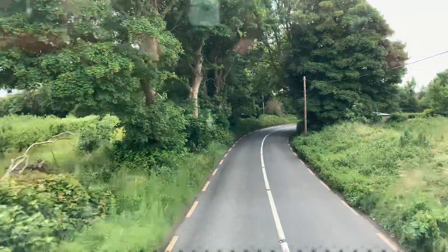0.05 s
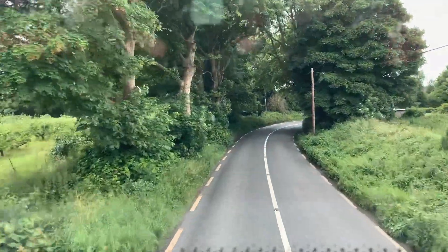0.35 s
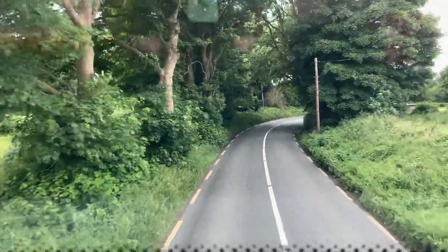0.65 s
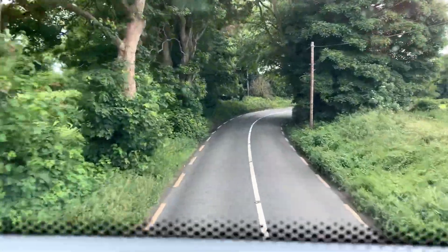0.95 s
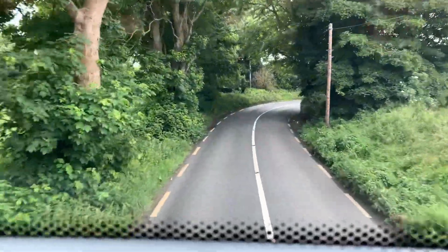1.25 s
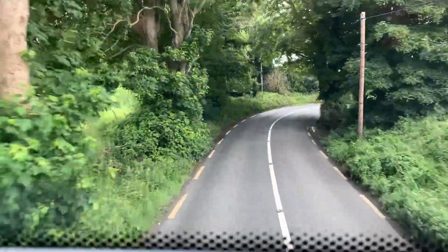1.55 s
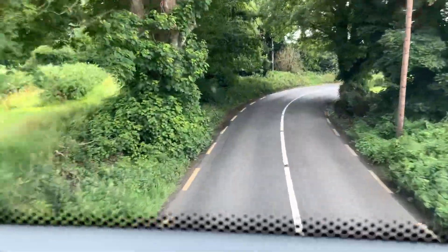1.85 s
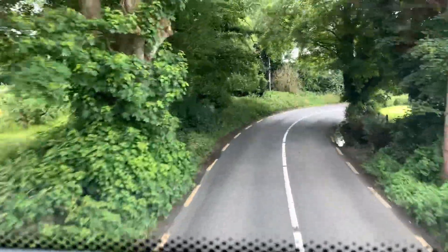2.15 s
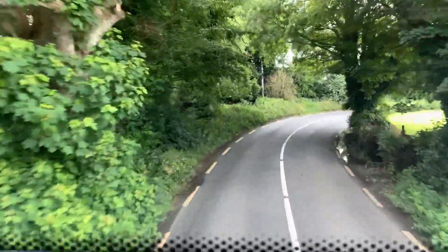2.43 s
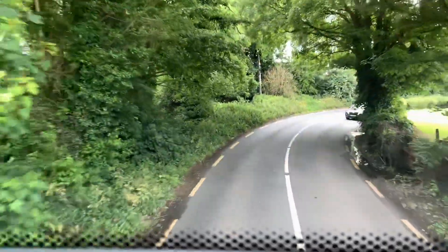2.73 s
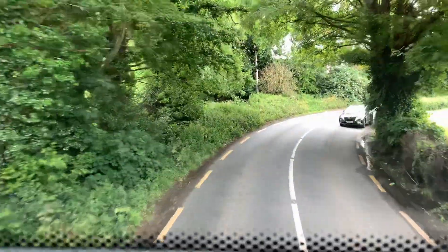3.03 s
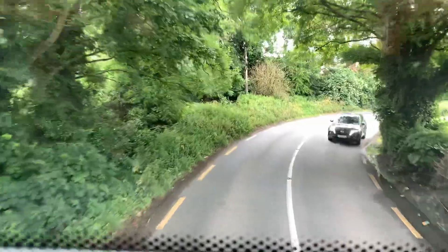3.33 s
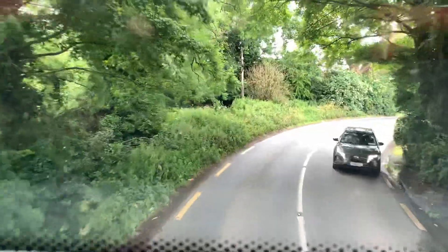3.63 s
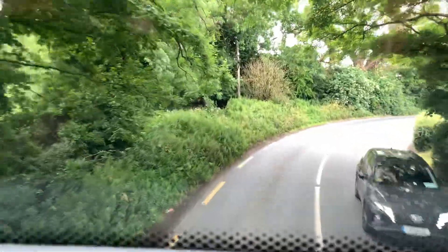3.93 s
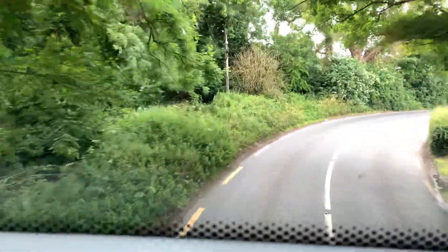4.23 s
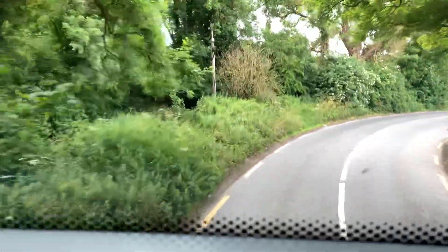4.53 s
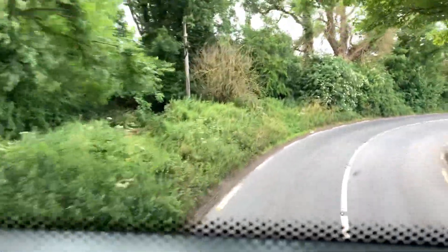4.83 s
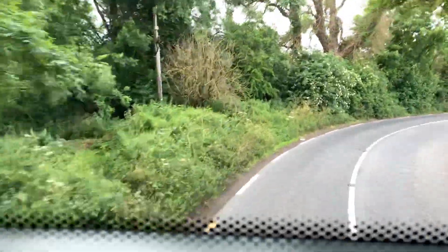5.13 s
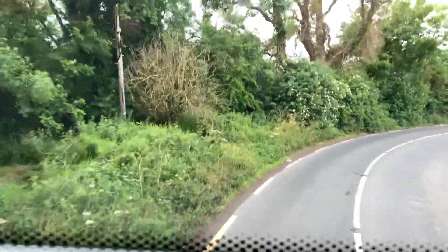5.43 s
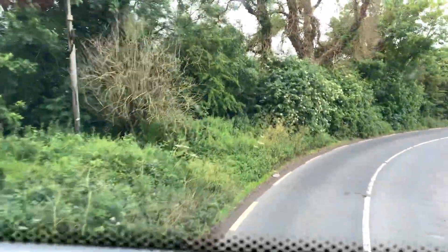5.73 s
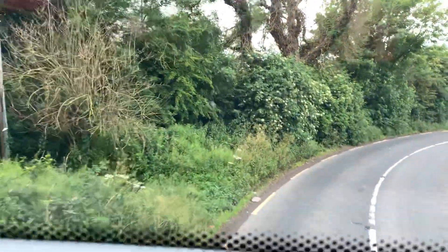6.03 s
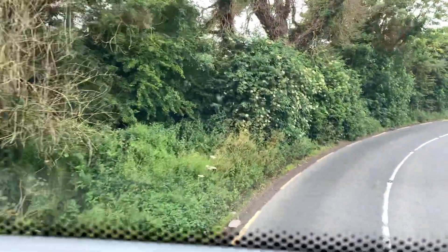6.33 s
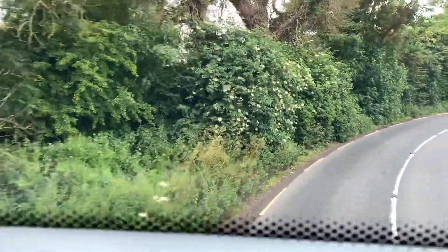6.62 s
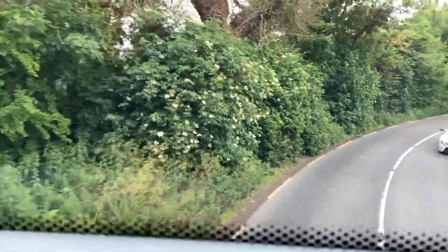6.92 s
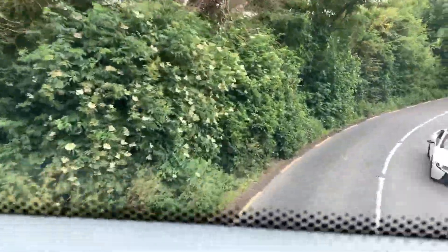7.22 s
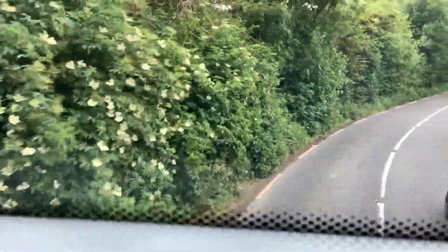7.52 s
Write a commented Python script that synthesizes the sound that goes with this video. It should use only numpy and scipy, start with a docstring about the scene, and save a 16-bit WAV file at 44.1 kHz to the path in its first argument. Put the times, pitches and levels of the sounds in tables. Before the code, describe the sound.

Heard from the front seat inside a bus on a country road, a low engine drone and hum run under a steady boom of road and tyres. Loose panels and fittings chatter, clink and knock throughout, with sharp plastic ticks and brief squeaks. The engine sinks in pitch, then picks up just past halfway as rougher tarmac brings louder thuds and rattles. Another jolt shakes the cabin near the end.

```python
"""Bus on a winding country road

Heard inside, at the front. The engine's firing harmonics drone, beat against a second hum and sink
as the bus eases into a bend. The road booms through the body and the tyres roar. Rough tarmac, dips
and bumps shake loose panels and fittings, which chatter, clink, knock, tick and squeak."""
import sys
import numpy as np
from scipy import signal
from scipy.fft import rfft, irfft, next_fast_len
from scipy.io import wavfile
from scipy.ndimage import uniform_filter1d, map_coordinates

SR = 44100
rng = np.random.default_rng(int(sys.argv[2]) if len(sys.argv) > 2 else 0)


def materialize(psi):
    """Save the field psi as 16-bit PCM at rate SR to the path in sys.argv[1].

    A 1-D psi becomes a single channel; in a 2-D psi each row is a channel.
    """
    bounded = np.clip(np.atleast_2d(psi).T, -1, 1)
    quanta = np.round(bounded * 32767).astype(np.int16)
    wavfile.write(sys.argv[1], SR, quanta)


N = 342657
TIME = np.arange(N) / SR
ATTACK_S = 0.0003
BUMP_LEAD_S = 0.025  # loose parts move before a bump's crest

# tarmac roughness: (time [s], tyre roar [dB], cabin rattle [dB])
ROUGHNESS = [(0.0, -35.5, -50), (0.13, -33, -38.5), (0.245, -31, -47), (0.29, -32, -41.5),
             (0.53, -34, -43.5), (0.7, -29.5, -42.5), (0.85, -32, -42.5), (1.05, -32.5, -38),
             (1.23, -30, -43.5), (1.28, -34, -39), (1.36, -30.5, -39.5), (1.7, -33.5, -38),
             (2.05, -34.5, -46.5), (2.3, -32, -46), (2.54, -34.5, -48), (2.72, -34, -47),
             (3.05, -31.5, -45.5), (3.55, -35, -50.5), (3.9, -32, -46), (4.02, -33.5, -43),
             (4.35, -29.5, -42.5), (4.71, -31, -42), (4.87, -28, -37), (5.12, -25, -28.5),
             (5.35, -27.5, -37.5), (5.46, -27.5, -35), (5.55, -26, -37.5), (5.68, -26.5, -43.5),
             (5.8, -28, -36.5), (5.95, -27.5, -37), (6.14, -31, -42.5), (6.25, -32, -39.5),
             (6.31, -30, -41.5), (6.55, -29, -35.5), (6.87, -32.5, -45.5), (7.1, -32, -46),
             (7.4, -33.5, -46.5), (7.55, -25.5, -34), (7.77, -25.5, -24.5)]
# road bumps: (time [s], strength [dB])
BUMPS = [(0.67, -31.5), (0.77, -33), (1.08, -31), (1.46, -37), (2.14, -32.5), (3.15, -36), (4.35, -36),
         (4.96, -29), (5.04, -30), (5.12, -27), (5.39, -27.5), (5.5, -30), (5.9, -40), (5.97, -34),
         (6.25, -30), (6.55, -38.5), (7.63, -38), (7.73, -30)]
# panel knocks: (time [s], level [dB], relative dull part [dB], pitch [Hz])
KNOCKS = [(0.0852, -43, 8, 1210), (0.19, -34, 3, 1945), (0.2578, -33.5, 5.5, 930), (0.3404, -36, -7, 1650),
          (0.4344, -35.5, 2, 920), (0.6544, -42, 9, 1151), (0.735, -30.5, 2, 781), (0.9184, -32.5, 3, 1310),
          (0.958, -33.5, -3, 1880), (1.0744, -31.5, -9, 908), (1.1694, -36, 9.5, 1690),
          (1.285, -44, -1, 1075), (1.4321, -29, -11, 1234), (1.465, -32, 1, 2736),
          (1.8826, -33.5, 3.5, 908), (2.2009, -28.5, 0, 1036), (2.3042, -35.5, 2, 1016),
          (2.4144, -40, 7, 908), (2.6753, -37, 2, 1930), (2.755, -39, 1, 1700), (2.859, -43, 10, 1223),
          (2.945, -40, -2, 1700), (3.03, -38, 2, 1248), (3.1324, -31.5, 2, 1110), (3.146, -38.5, 5, 805),
          (3.2326, -33.5, -3, 1343), (3.764, -29.5, 0.5, 906), (3.917, -29, 3, 1246),
          (4.3404, -34.5, 11, 1240), (4.372, -40, 12, 1000), (4.63, -32, 0, 1250), (4.7331, -29.5, 0, 1275),
          (4.9816, -22.5, -14, 1738), (5.025, -31, 9, 1247), (5.0514, -29.5, 10.5, 1095),
          (5.1114, -24, -5, 1850), (5.131, -26, 7.5, 1014), (5.165, -22.5, 3, 1706), (5.2494, -31, 6, 1300),
          (5.3706, -29, 7, 887), (5.46, -37, 11, 1120), (5.4894, -32, 8, 2050), (5.5954, -28, 4.5, 1195),
          (5.7034, -31.5, 4, 2400), (5.912, -36, 13, 1700), (5.9483, -25, 3.5, 1060), (5.979, -39, 15, 906),
          (6.0164, -35, 1, 1740), (6.058, -32.5, 7, 1250), (6.2053, -35.5, 9, 2000), (6.245, -38, 13, 1018),
          (6.4155, -25, -12, 2200), (6.475, -30, 1, 2380), (6.5494, -39, 12, 1170),
          (6.6178, -29, -20, 2660), (6.7695, -38.5, 9, 1080), (6.9644, -32, 4.5, 1080),
          (6.985, -30.5, -3, 1490), (7.3002, -35.5, -1, 1233), (7.452, -26.5, 2, 1260),
          (7.5517, -31, 11, 1080), (7.612, -34, 8, 994), (7.6789, -19, -7, 2350), (7.725, -28.5, 8, 1230)]
# panel and fitting resonances: (centre [Hz], width [Hz], lift [dB])
CABIN_MODES = [(296, 12, 0), (381, 30, 0.5), (445, 12, 3), (567, 13, -1), (630, 20, 1), (794, 25, -1.5),
               (1043, 30, -1.5), (1247, 33, 1), (1691, 83, 2.5), (1981, 34, 1), (2278, 14, 0),
               (2750, 34, 1), (3480, 51, 4), (4050, 43, 3.5), (4400, 30, 3), (4700, 31, 0), (5263, 29, 4.5),
               (6940, 32, 2)]
# hollow bodywork: (frequency [Hz], density [dB])
BODY_SPECTRUM = [(250, -25), (380, 4.5), (480, 0.5), (570, -8), (680, -2.5), (800, -17), (1100, -8),
                 (2500, -57)]
# big panels: (frequency [Hz], density [dB])
PANEL_SPECTRUM = [(300, -24), (480, 8), (650, 3), (800, 6.5), (980, 0), (1200, 0.5), (1480, -4),
                  (1720, -2.5), (2200, -5), (2900, -12.5), (5000, -27), (15000, -68)]
# light fittings: (frequency [Hz], density [dB])
FITTING_SPECTRUM = [(1200, 2), (2200, 1.5), (2750, 3.5), (3250, -5.5), (3500, 1), (4400, 0), (5200, -3.5),
                    (6500, -6), (7900, -10.5), (9500, -7.5), (11000, -20.5), (15500, -28.5)]


def from_db(db):
    """Decibels to gain."""
    return 10 ** (np.asarray(db) / 20)


def unit_rms(x):
    """Scale to rms 1."""
    return x / np.sqrt(np.mean(x ** 2) + 1e-20)


def in_time(rows):
    """Each column after the time, at every sample."""
    times_s, *columns = np.transpose(rows)
    return [np.interp(TIME, times_s, column) for column in columns]


def at_hz(rows, hz):
    """Read a curve on a log-frequency axis."""
    knots_hz, values = np.transpose(rows)
    return np.interp(np.log(hz + 1), np.log(knots_hz), values)


def drift(rate_hz):
    """Smooth random curve, rms 1."""
    knots = rng.standard_normal(4096)
    return unit_rms(map_coordinates(knots, [TIME * rate_hz], order=2, mode="wrap"))


def swells(rows, sigma_s):
    """Gaussian envelope per (time [s], level [dB]) row."""
    return sum(from_db(db) * np.exp(-0.5 * ((TIME - at_s) / sigma_s) ** 2) for at_s, db in rows)


def add(out, at_s, sound):
    """Mix a sound in at a time."""
    start = max(round(at_s * SR), 0)
    out[:, start:start + sound.shape[1]] += sound[:, :N - start]


def noise(spectrum, modes=(), size=N):
    """Coloured stereo noise, rms 1; coherent in the bass, mostly diffuse above."""
    # left-right likeness: (frequency [Hz], correlation [-1..1])
    likeness = [(30, 1), (80, 0.97), (160, 0.88), (300, 0.68), (450, 0.21), (660, -0.53), (1100, 0.02),
                (1600, -0.31), (2800, 0), (4300, 0.1), (7000, 0.2), (8500, -0.5), (9300, -1), (10700, -1),
                (11500, 0.5), (13000, 1)]
    # stereo balance: (frequency [Hz], left minus right [dB])
    balance = [(30, 1.5), (90, 2.5), (300, 2.3), (500, -0.7), (1300, -1), (2500, 0.8), (6000, 1),
               (10000, 0)]
    padded = next_fast_len(size, True)
    hz = np.arange(padded // 2 + 1) * SR / padded
    level_db = at_hz(spectrum, hz)
    for centre_hz, width_hz, lift_db in modes:
        level_db = level_db + lift_db / (1 + (2 * (hz - centre_hz) / width_hz) ** 2)
    mid, side = rfft(rng.standard_normal((2, padded)))
    correlation = np.clip(at_hz(likeness, hz), -1, 1)
    sign = np.array([[1], [-1]])
    pair = np.sqrt(1 + correlation) * mid + sign * np.sqrt(1 - correlation) * side
    gain = from_db(level_db + sign * at_hz(balance, hz) / 2)
    return unit_rms(irfft(pair * gain, padded)[:, :size])


def steadied(x, window_s):
    """Divide by the running rms to remove slow swells."""
    power = uniform_filter1d(np.mean(x ** 2, axis=0), int(window_s * SR) + 1)
    return x / np.sqrt(np.maximum(power, 1e-9))


def part_modes(lift_db=5.5, relative_width=0.018, count=9):
    """Cabin resonances plus a loose part's own, scattered over three octaves."""
    centres_hz = 650 * 2 ** ((np.arange(count) + rng.random(count)) * 3 / count)
    return list(CABIN_MODES) + [(hz, relative_width * hz, lift_db) for hz in centres_hz]


def contact(spectrum, modes, crack_t60_s, cabin_t60_s, cabin_db, size=16384):
    """One touch: a noise crack plus its cabin reverberation."""
    t = np.arange(size) / SR
    attack = 1 - np.exp(-t / ATTACK_S)
    decay = from_db(-60 * t / crack_t60_s) + from_db(cabin_db - 60 * t / cabin_t60_s)
    return noise(spectrum, modes, size) * attack * decay


def panel_note(hz, t60_s=0.073, overtone_ratio=2.3):
    """A struck panel rings with one inharmonic overtone, weaker on small, high panels."""
    t = np.arange(4096) / SR
    phase = 2 * np.pi * hz * t
    low_rad, high_rad = rng.uniform(0, 2 * np.pi, (2, 2, 1))
    overtone_gain = from_db(-6) / (1 + (hz / 1200) ** 4)
    tone = np.sin(phase + low_rad) + overtone_gain * np.sin(overtone_ratio * phase + high_rad)
    return tone * from_db(-60 * t / t60_s) * (1 - np.exp(-t / ATTACK_S))


def tap_forces(spread_db):
    """Random signed tap strength at every sample."""
    return from_db(spread_db * np.minimum(rng.exponential(1, N), 2)) * rng.choice([-1, 1], N)


def cabin_shake_db(usual_db=-42):
    """Cabin shaking relative to its usual level."""
    return in_time(ROUGHNESS)[1] - usual_db


def stirred(rows, lead_s=0, rise_s=0.0039, settle_s=0.066):
    """Envelope of loose parts: each jolt stirs them at once, then they settle."""
    total = 0
    for at_s, db, *_ in rows:
        age_s = np.maximum(TIME - at_s + lead_s, 0)
        total = total + from_db(db) * (1 - np.exp(-age_s / rise_s)) * np.exp(-age_s / settle_s)
    return total


def bumps(gain_db=-5):
    """Uneven road makes the hollow body resound briefly."""
    envelope = from_db(gain_db) * swells(BUMPS, sigma_s=0.042)
    return envelope * steadied(noise(BODY_SPECTRUM, CABIN_MODES), 0.0066)


def road(usual_roar_db=-32):
    """The body heaves, the floor booms, walls drum and tyres roar; the bass follows the tarmac least."""
    # body heave: (frequency [Hz], density [dB])
    heave_spectrum = [(10, -23), (20, -1), (28, 31), (38, 7), (46, -14), (60, -13), (90, -71)]
    # floor boom: (frequency [Hz], density [dB])
    boom_spectrum = [(30, -32), (40, -2), (50, 0), (63, 3), (80, 0), (92, -4), (108, -3), (125, -7.5),
                     (160, -11.5), (400, -85)]
    # road dips: (time [s], level [dB])
    dips = [(0.68, -21), (3.06, -20), (4.3, -39), (4.95, -15.5), (5.75, -21.5), (6.25, -23), (6.77, -22),
            (6.98, -18.5), (7.65, -16.5)]
    # floor pan after a dip: (frequency [Hz], density [dB])
    pan_spectrum = [(30, -28), (48, 1), (62, 8.5), (75, 11), (100, -36), (200, -68)]
    # side walls: (frequency [Hz], density [dB])
    wall_spectrum = [(90, -9), (130, -9), (162, 1.5), (200, -6), (250, -5.5), (300, -10.5), (600, -101)]
    # tyre roar: (frequency [Hz], density [dB])
    tyre_spectrum = [(190, -41), (265, -5), (298, 4), (335, -5), (390, -3.5), (445, -4.5), (520, -11),
                     (750, -22), (1500, -22), (4000, -43), (15000, -82)]
    rough_db = in_time(ROUGHNESS)[0] - usual_roar_db
    heave_db = -32.5 + 0.41 * (rough_db + 4.5 * drift(5.9))
    heave = from_db(heave_db) * steadied(noise(heave_spectrum), 0.17)
    boom_db = -22 + 0.69 * rough_db + 0.5 * drift(9.2)
    boom = from_db(boom_db) * steadied(noise(boom_spectrum), 0.12)
    floor_pan = swells(dips, sigma_s=0.06) * steadied(noise(pan_spectrum), 0.12)
    walls = from_db(-29.5 + rough_db) * steadied(noise(wall_spectrum), 0.17)
    tyres = from_db(-33.5 + 0.95 * rough_db) * steadied(noise(tyre_spectrum, CABIN_MODES), 0.57)
    return heave + boom + floor_pan + walls + tyres


def hum(flutter_db=2.2, pan_db=0.8):
    """A second rotating part, probably the driveline, beats against the engine from just above."""
    # hum: (time [s], pitch [Hz], level [dB], octave below [dB])
    hum_curve = [(0.0, 111, -26, -40), (0.3, 114, -26, -37), (0.85, 113.8, -31, -37),
                 (1.2, 112.4, -34, -28), (1.52, 111.6, -32, -21.5), (1.8, 110.5, -35, -38),
                 (2.65, 108, -30, -42), (3.3, 106.5, -32, -49), (4.2, 106, -57, -57)]
    hz, upper_db, lower_db = in_time(hum_curve)
    phase = 2 * np.pi * np.cumsum(hz) / SR + 4 * np.pi * rng.random()
    tone = from_db(upper_db) * np.sin(phase) + from_db(lower_db) * np.sin(phase / 2)
    return np.sqrt(2) * tone * from_db(flutter_db * drift(9.34)) * from_db([[pan_db], [-pan_db]])


def engine(flutter_db=0.5, pan_db=1.8):
    """Only the lowest three firing harmonics pass through the body from the engine bay."""
    # firing: (time [s], rate [Hz], fundamental [dB], upper harmonics [dB])
    firing_curve = [(0.0, 48.83, -44, -23), (0.35, 51.23, -26, -25), (0.8, 52.45, -32, -23.5),
                    (0.95, 52.03, -16.5, -22), (1.15, 51.9, -19.5, -34), (1.8, 50.45, -15.5, -25),
                    (2.35, 48.55, -19, -28.5), (2.7, 47.66, -19.5, -23.5), (3.1, 46.34, -21, -39),
                    (3.6, 45.25, -19, -32), (4.05, 43.07, -30, -32), (4.75, 54.5, -34, -30),
                    (5.05, 55.4, -21, -33), (5.4, 52.9, -24, -26), (5.8, 53.17, -31, -33),
                    (6.2, 56, -21, -31), (6.75, 54.5, -48, -51), (7.2, 46.27, -19.5, -41),
                    (7.45, 47.5, -22.5, -37), (7.62, 53.9, -23, -34), (7.77, 54, -39, -36)]
    firing_hz, first_db, upper_db = in_time(firing_curve)
    phase = 2 * np.pi * np.cumsum(firing_hz) / SR
    drone = 0
    for harmonic, db in enumerate([first_db - 0.5, upper_db - 1, upper_db - 15], 1):
        gain = from_db(db + flutter_db * drift(12))
        drone = drone + gain * np.sin(harmonic * phase + 2 * np.pi * rng.random())
    return np.sqrt(2) * drone * from_db([[pan_db], [-pan_db]])


def thuds(gain_db=-1.5, rise_s=0.0027, t60_cycles=50, shudder_db=-2):
    """The suspension jolts the body: one large section rings while the rest shudders."""
    # bodywork thuds: (time [s], level [dB], pitch [Hz])
    jolts = [(0.27, -30, 314), (0.39, -31, 483), (0.66, -27.5, 578), (0.735, -28, 537), (0.795, -35, 590),
             (0.975, -26.5, 465.6), (1.075, -26, 510), (1.32, -25, 334), (1.44, -24, 303.8),
             (1.62, -36, 440), (2.09, -26, 309), (2.215, -28, 517.5), (2.40, -30, 375), (2.59, -27, 334.6),
             (2.86, -31, 321), (3.146, -29.5, 348), (4.97, -26, 388), (5.08, -26, 454), (5.125, -27, 350),
             (5.16, -18.5, 650), (5.24, -35, 346), (5.372, -20.5, 431), (5.45, -26, 620.6),
             (5.485, -16, 307), (5.53, -25.5, 777), (5.865, -29, 594), (5.905, -27, 741), (5.95, -22, 652),
             (5.98, -25, 604.5), (6.245, -28, 606), (6.42, -31, 301), (6.535, -28, 560), (6.665, -28, 535),
             (7.625, -21, 345), (7.69, -22, 436)]
    out = np.zeros((2, N))
    for at_s, db, hz in jolts:
        shudder = contact(BODY_SPECTRUM, (), crack_t60_s=0.033, cabin_t60_s=0.19, cabin_db=-15)
        t = np.arange(shudder.shape[1]) / SR
        envelope = from_db(-60 * t * hz / t60_cycles) * (1 - np.exp(-t / rise_s))
        note = np.sin(2 * np.pi * hz * t + rng.normal(0, 1, (2, 1))) * envelope
        add(out, at_s, from_db(db + gain_db) * (2 * note + from_db(shudder_db) * shudder))
    return out


def ringing(taps_per_s=30, tilt_db_per_octave=-5, ref_hz=750, ref_t60_s=0.095, top_hz=3000):
    """Loose parts tap each low panel resonance in its own rhythm; higher ones die sooner."""
    out, t = 0, np.arange(8192) / SR
    for hz, _, lift_db in [mode for mode in CABIN_MODES if mode[0] < top_hz]:
        taps = tap_forces(spread_db=4) * (rng.random(N) < taps_per_s / SR)
        t60_s = ref_t60_s * np.sqrt(ref_hz / hz)
        stereo_rad = rng.choice([-1, 1]) * np.array([[0], [np.pi / 2]])
        response = np.sin(2 * np.pi * hz * t + stereo_rad) * from_db(-60 * t / t60_s)
        ring = unit_rms(signal.oaconvolve(taps[None], response, axes=1)[:, :N])
        out = out + from_db(lift_db + tilt_db_per_octave * np.log2(hz / ref_hz)) * ring
    shake = from_db(-49.5 + 0.94 * cabin_shake_db())
    stir = from_db(-16) * stirred(BUMPS, BUMP_LEAD_S)
    return np.hypot(shake, stir) * out


def clinks(base_db=-37, spread_db=3.5, lowest_hz=750, tilt_db_per_octave=-3.8, count=480):
    """Small loose parts clink at random times and pitches, as hard as the cabin shakes."""
    out = np.zeros((2, N))
    shake_db = cabin_shake_db()
    for position, octaves, strength in rng.uniform([0, 0, -1], [1, 2.7, 1], (count, 3)):
        start = int(position * N)
        db = base_db + spread_db * strength + tilt_db_per_octave * octaves + shake_db[start]
        add(out, start / SR, from_db(db) * panel_note(lowest_hz * 2 ** octaves))
    return out


def squeaks(gain_db=-2, waver_hz=75, flutter_db=3.5, slips_per_s=260):
    """Seals and trim slip in brief chirps that waver and flutter around one pitch."""
    # rubs: (time [s], pitch [Hz], level [dB], Gaussian sigma [s])
    rubs = [(0.117, 3460, -40, 0.011), (1.596, 3500, -44, 0.016), (2.183, 3518, -40.5, 0.011),
            (2.371, 3474, -47, .012), (3.399, 3460, -54, 0.019), (3.94, 3503, -42, .012),
            (3.96, 3740, -38.5, 0.015), (4.1, 3480, -52, .02), (4.185, 3480, -45, 0.011),
            (5.01, 3484, -39, 0.012), (5.113, 3550, -41, 0.016), (5.301, 1704, -32.5, 0.0082),
            (5.797, 3440, -34, 0.011), (7.1, 3530, -47, .015), (7.178, 3540, -46, .02),
            (7.179, 2253, -42, 0.018), (7.709, 6960, -31.5, 0.029)]
    waver_cycles = np.cumsum(waver_hz * drift(slips_per_s)) / SR
    chirps = sum(swells([(at_s, db)], sigma_s) * np.exp(2j * np.pi * (hz * TIME + waver_cycles))
                 for at_s, hz, db, sigma_s in rubs)
    gain = np.sqrt(2) * from_db(gain_db + flutter_db * drift(slips_per_s))
    return gain * np.array([chirps.real, chirps.imag])


def ticks(snap_db=0.5, shell_db=-2.5, cabin_t60_s=0.2):
    """Hard plastic snaps close by, centred and nearly dry; its shell rings briefly."""
    # snaps: (time [s], level [dB], relative shell level [dB])
    snaps = [(0.027, -36, 5), (0.0867, -31.5, -19), (0.437, -30, -3), (0.8895, -31.5, -12),
             (1.1328, -41, -14), (1.5242, -22.5, -28), (1.559, -28.5, -18), (1.9985, -29.5, -1),
             (2.099, -31, -1), (2.2198, -31, -1), (2.3338, -32, -2), (2.5594, -34, 3), (2.803, -41, -4),
             (2.8573, -33.5, 3.5), (3.632, -33.5, 1.5), (3.7451, -35, 2), (3.917, -31.5, -8),
             (4.3005, -36, 1), (6.0305, -31.5, 4), (6.7686, -30, 4), (7.151, -35.5, -4), (7.4036, -32, -13)]
    # plastic snap: (frequency [Hz], density [dB])
    snap_spectrum = [(800, 1), (1500, 1), (3000, 0.21), (6000, 4.5), (9500, -2.8), (13000, 1), (16000, 2.5)]
    out = np.zeros((2, N))
    for at_s, db, relative_db in snaps:
        snap = contact(snap_spectrum, (), 0.0068, cabin_t60_s, cabin_db=-24.5)[0]
        shell = contact(PANEL_SPECTRUM, part_modes(), 0.083, cabin_t60_s, cabin_db=-10)
        add(out, at_s, from_db(db + snap_db) * snap + from_db(db + relative_db + shell_db) * shell)
    return out


def knocks(bright_db=-6, dull_db=-10, note_db=-6, rebound_s=0.013, rebound_db=-6):
    """A jolted panel hits its frame, sounds its note and rebounds once; its fittings ring along."""
    out = np.zeros((2, N))
    for at_s, db, relative_db, hz in KNOCKS:
        bright = contact(FITTING_SPECTRUM, part_modes(), 0.18, cabin_t60_s=0.21, cabin_db=-20.5)
        dull = contact(PANEL_SPECTRUM, part_modes(), 0.11, cabin_t60_s=0.22, cabin_db=-1)
        knock = from_db(db + bright_db) * bright + from_db(db + relative_db + dull_db) * dull
        add(out, at_s, knock)
        add(out, at_s, from_db(db + relative_db + note_db) * panel_note(hz))
        add(out, at_s + rebound_s * rng.uniform(0.65, 1.4), from_db(rebound_db) * knock)
    return out


def chatter(spectrum, taps_per_s, spread_db, bounce_db, bounce_hz, crack_t60_s, cabin_t60_s, parts=9):
    """Loose parts tap at random, each in its own bunches as the body bounces."""
    out = 0
    for _ in range(parts):
        touches = rng.random(N) < taps_per_s / parts / SR
        taps = touches * tap_forces(spread_db)
        bounce = from_db(bounce_db * np.tanh(drift(bounce_hz)))
        response = contact(spectrum, part_modes(), crack_t60_s, cabin_t60_s, cabin_db=-6)
        out = out + signal.oaconvolve((taps * bounce)[None], response, axes=1)[:, :N]
    return steadied(out, window_s=0.11)


def rattles(rock_db=0.5, rock_hz=16, edge_s=0.006):
    """Panels, fittings and trim rattle as the body rocks; bumps and knocks stir the first two."""
    # trim rustle: (frequency [Hz], density [dB])
    trim_spectrum = [(4000, -28), (8000, 5), (9500, 4), (10800, -3), (11800, 3.5), (13500, 1), (15500, -12)]
    # flurries of trim and fittings: (time [s], length [s], level [dB])
    flurries = [(0.57, 0.023, -51.5), (0.808, 0.095, -56), (1.124, 0.052, -46), (1.358, 0.22, -53),
                (1.696, 0.13, -59), (2.328, 0.048, -56), (4.3, 0.036, -49), (4.909, 0.1, -49),
                (5.115, 0.06, -46), (5.236, 0.029, -50), (5.628, 0.2, -49), (6.42, 0.064, -51),
                (7.405, 0.026, -51), (7.682, 0.061, -40.5)]
    panels = chatter(PANEL_SPECTRUM, taps_per_s=330, spread_db=-0.5, bounce_db=8, bounce_hz=22,
                     crack_t60_s=0.21, cabin_t60_s=0.14)
    fittings = chatter(FITTING_SPECTRUM, taps_per_s=340, spread_db=2, bounce_db=14, bounce_hz=24,
                       crack_t60_s=0.17, cabin_t60_s=0.44)
    trim = chatter(trim_spectrum, taps_per_s=700, spread_db=5.5, bounce_db=7, bounce_hz=37,
                   crack_t60_s=0.018, cabin_t60_s=0.19, parts=3)
    shake_db = cabin_shake_db() + rock_db * drift(rock_hz)
    panel_stir = from_db(-6) * stirred(BUMPS, BUMP_LEAD_S) + from_db(-13) * stirred(KNOCKS)
    trim_stir = 0
    for at_s, length_s, db in flurries:
        gate = np.interp(TIME - at_s, [0, edge_s, length_s, length_s + edge_s], [0, 1, 1, 0])
        trim_stir = trim_stir + from_db(db + 1) * gate
    fitting_stir = from_db(-7) * panel_stir + from_db(2) * trim_stir
    # shake and stir add in power
    return (np.hypot(from_db(-40 + 0.7 * shake_db), panel_stir) * panels
            + np.hypot(from_db(-42.5 + 1.05 * shake_db), fitting_stir) * fittings
            + np.hypot(from_db(-63 + 1.27 * shake_db), trim_stir) * trim)


def scene():
    """The mix at the front seat."""
    rumble = engine() + hum() + road() + bumps() + thuds()
    return rumble + rattles() + ringing() + clinks() + knocks() + ticks() + squeaks()


def record(dry, low_cut_hz=12, ceiling=0.9, high_cut_hz=15500):
    """High-pass, soft peak limit, steep low-pass."""
    high_passed = signal.sosfilt(signal.butter(2, low_cut_hz, "high", fs=SR, output="sos"), dry)
    limited = high_passed / (1 + (high_passed / ceiling) ** 6) ** (1 / 6)
    return signal.sosfilt(signal.ellip(10, 0.1, 90, high_cut_hz, fs=SR, output="sos"), limited)


dry = scene()
out = record(dry)
materialize(out)
```